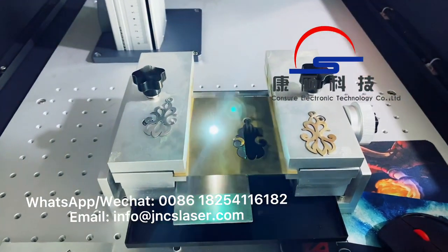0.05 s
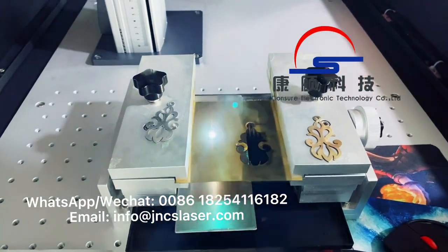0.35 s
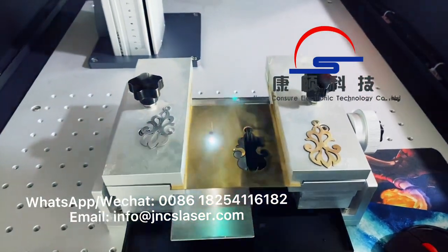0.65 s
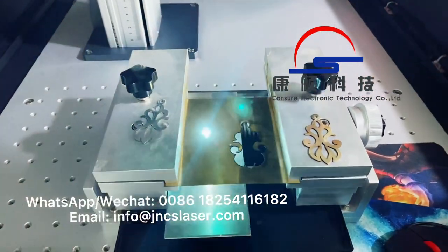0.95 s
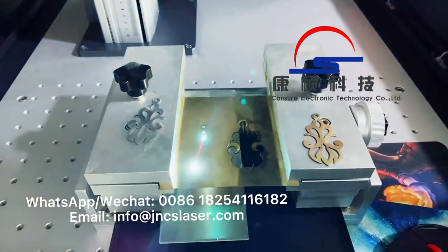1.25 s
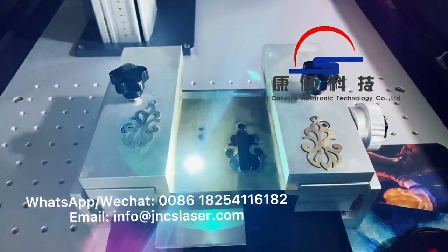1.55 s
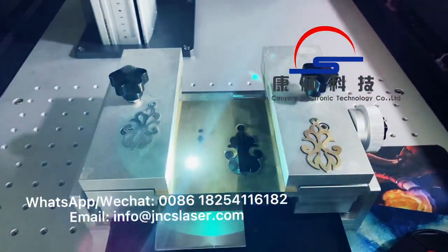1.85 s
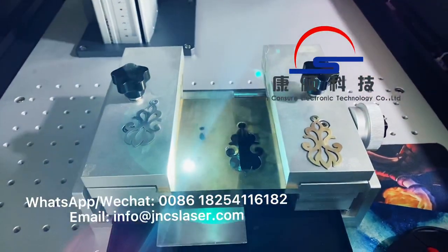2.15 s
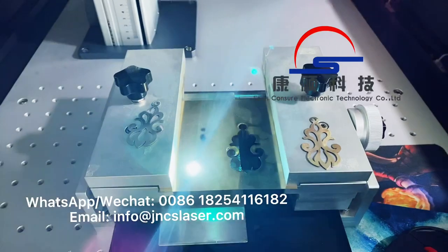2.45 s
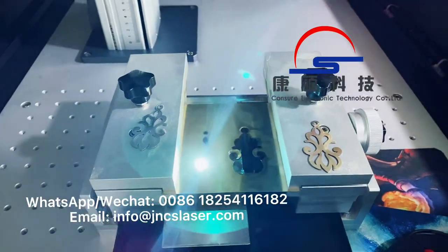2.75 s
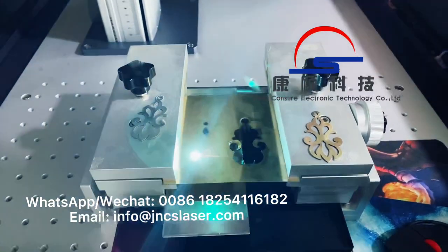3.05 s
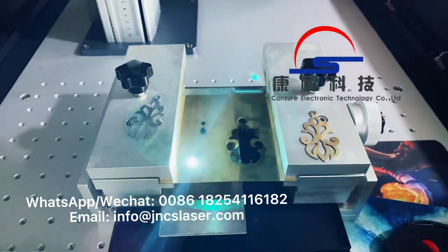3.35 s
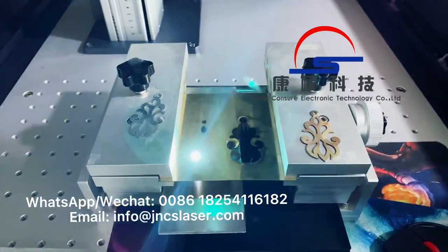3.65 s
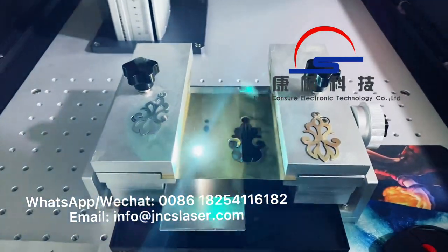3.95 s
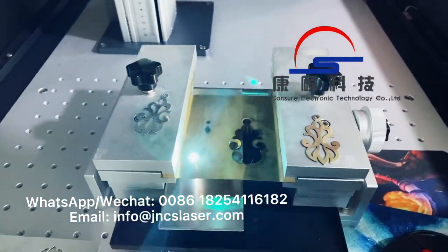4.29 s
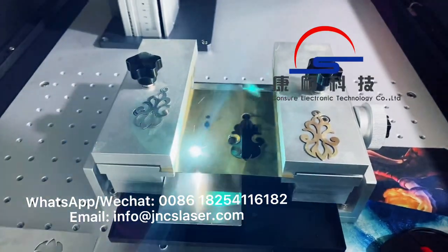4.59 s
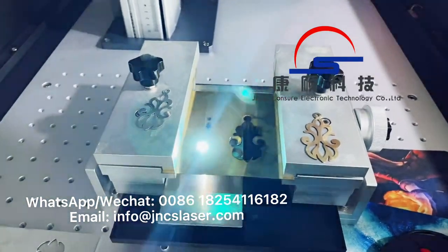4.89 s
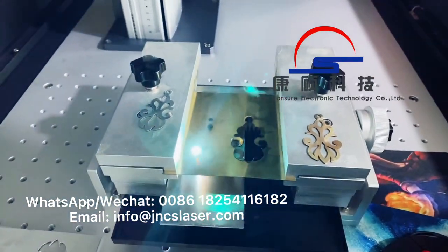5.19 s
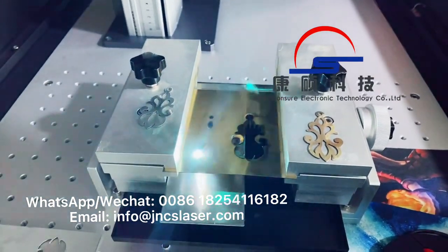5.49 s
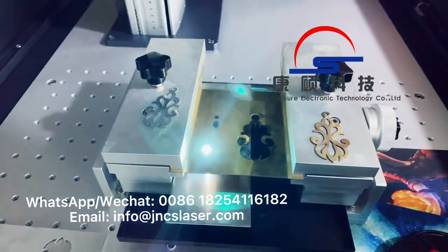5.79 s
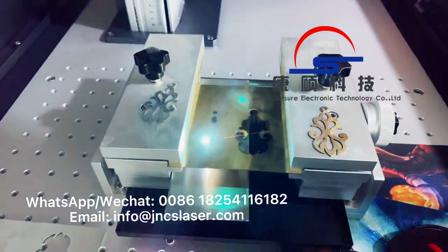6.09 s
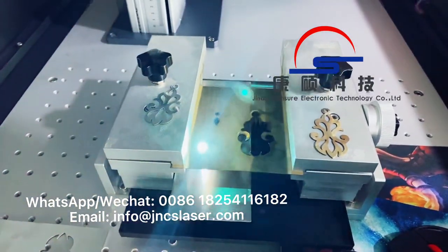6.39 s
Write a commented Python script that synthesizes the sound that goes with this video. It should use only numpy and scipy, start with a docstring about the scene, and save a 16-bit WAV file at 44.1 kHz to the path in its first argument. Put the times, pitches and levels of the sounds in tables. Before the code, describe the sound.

Over a low fan hum, a laser cutting sheet metal whistles and hisses, with one harsh rasp, a sharp pop and some sputtering.

```python
"""A wavering whistle with overtones over a bright hiss: a scanning laser cuts thin sheet metal.
The beam wobbles about 1300 times a second, so the vapour plume pulses, sounding the whistle and
chopping the hiss. It runs round the same outline about once a second. For half a second it bites hard
and rasps, then the melt pops, rings shrilly and sputters. Cooling fans drone in the workshop."""
import sys
import numpy as np
from scipy import signal
from scipy.fft import rfft, irfft, next_fast_len
from scipy.io import wavfile
from scipy.ndimage import uniform_filter1d

SR = 44100
rng = np.random.default_rng(int(sys.argv[2]) if len(sys.argv) > 2 else 0)


def pcm_store(signal):
    """Save signal as 16-bit PCM."""
    levels = np.round(np.clip(np.atleast_2d(signal), -1, 1) * 32767)
    wavfile.write(sys.argv[1], SR, levels.astype(np.int16).T)


N = 283563
T = np.arange(N) / SR
LAP_S = 1.0545  # once round the outline
# hard bites into the sheet: start/s, end/s, rasp level/dB, depth/0-1
BITES = [(0.783, 1.303, -25.5, 1), (2.42, 2.464, -34, 0.07), (3.406, 3.447, -30, 0),
         (4.46, 4.52, -34, 0.16), (5.515, 5.587, -31, 0.08)]


def undb(db):
    """Decibels to gain."""
    return 10 ** (np.asarray(db) / 20)


def unit(x):
    """Scale to rms 1."""
    return x / np.sqrt(np.mean(x ** 2))


def curves(rows):
    """Each column of a time table, linearly interpolated."""
    times_s, *columns = np.transpose(rows)
    return [np.interp(T, times_s, column) for column in columns]


def bells(rows):
    """Gaussian bumps in dB from rows of t/s, half-width/s, gain/dB."""
    return sum(db * np.exp(-((T - at_s) / half_s) ** 2) for at_s, half_s, db in rows)


def stretch(start_s, end_s, fade_s, clock_s=T):
    """1 between start and end, with linear fades."""
    return np.clip(np.minimum(clock_s - start_s, end_s - clock_s) / fade_s + .5, 0, 1)


def walk(rate_hz):
    """Smooth random wander, rms 1."""
    step = max(int(SR / rate_hz), 1)
    return unit(uniform_filter1d(np.repeat(rng.standard_normal(N // step + 1), step), step)[:N])


def drift(rows, bite, bite_db, wander_db):
    """Level in dB: follows a slow curve, jumps during a bite, wanders a little."""
    return curves(rows)[0] + bite_db * bite + wander_db * walk(14)


def colour(x, spectrum):
    """Filter x by rows of f/Hz, gain/dB; rms 1."""
    hz, db = np.transpose(spectrum)
    size = next_fast_len(N)
    bins_hz = np.maximum(np.fft.rfftfreq(size, 1 / SR), 1)
    gain = undb(np.interp(np.log(bins_hz), np.log(hz), db))
    return unit(irfft(rfft(x, size) * gain, size)[:N])


def resonance(x, hz, width_hz):
    """Two passes through a peak filter; rms 1."""
    b, a = signal.iirpeak(hz, hz / width_hz, fs=SR)
    return unit(signal.lfilter(b, a, signal.lfilter(b, a, x)))


def puffs(phase, depth):
    """Turbulence leaving the cut in one puff per wobble."""
    return rng.standard_normal(N) * np.exp(depth * np.cos(phase))


def partial(phase, multiple, db, flutter_db, blur_rad):
    """One line of the plume; the restless melt shakes its level and phase."""
    shake_db = flutter_db * (walk(60) + 1.09 * walk(420))
    jitter = blur_rad * (walk(70) + 0.2 * walk(400))
    tone = np.sqrt(2) * np.sin(multiple * phase + jitter + rng.uniform(0, 2 * np.pi))
    return undb(db + shake_db) * tone


def outline(turn_s, plume_lag_s):
    """Strokes repeat each lap: share of slow wobble (0-1), and whistle lift/dB smoothed by inertia."""
    # slow-wobble strokes within a lap: start/s, end/s, lift/dB
    strokes = [(0.131, .175, 3.5), (0.196, .262, 5), (.275, .288, -1.5), (0.304, 0.327, -2),
               (0.461, .565, 3.5), (.72, 0.737, -0.5), (.77, 0.803, 4), (0.877, .972, 5),
               (1.004, 1.044, 4.5)]
    slow, lift_db = np.zeros(N), np.zeros(N)
    for start_s, end_s, db in strokes:
        gate = stretch(start_s, end_s, turn_s, clock_s=T % LAP_S)
        slow += gate
        lift_db += db * gate
    return slow, uniform_filter1d(lift_db, size=int(plume_lag_s * SR))


def whistle(phase, slow, bite, lift_db):
    """The plume swells once per wobble: a wavering note with an airy skirt and rougher overtones."""
    # base levels of harmonics 1-4: t/s, level/dB
    first = [(0, -41.5), (.27, -37), (.49, -41), (.53, -32), (.65, -42.5), (.77, -46), (.8, -34.5),
             (1.66, -30), (2.26, -37.5), (2.64, -33.5), (2.93, -39.5), (3.75, -33.5), (4.02, -38.5),
             (4.29, -32.5), (4.68, -35), (5.31, -30.5), (6.07, -37), (6.43, -31.5)]
    second = [(0, -48), (.23, -40), (.33, -49), (.51, -42), (.86, -49), (1.66, -43), (2.77, -45),
              (3.1, -38.5), (3.17, -60), (3.33, -39.5), (3.7, -44.5), (4.1, -37.5), (4.9, -34.5),
              (4.96, -49), (5.06, -34), (5.8, -37.5), (6, -45.5), (6.43, -43)]
    third = [(0, -45), (.55, -40), (.76, -41), (.8, -34.5), (1.12, -32.5), (1.4, -41.5), (2.4, -53),
             (3.3, -62), (3.82, -40.5), (4.42, -47), (4.54, -33), (4.68, -41.5), (5.2, -41.5),
             (5.64, -33.5), (6.12, -42), (6.43, -38)]
    fourth = [(0.0, -48.4), (0.41, -35), (0.68, -45), (1.19, -43.5), (1.24, -34), (1.5, -46.2), (3.09, -41),
              (5.08, -42.5), (5.13, -35), (5.96, -46), (6.2, -35.7), (6.43, -42)]
    # weak overtones following the third: multiple of wobble rate, gain/dB
    upper = [(5, -9.5), (7, -10.5)]
    # the plume falters: t/s, half-width/s, gain/dB
    falters = [(.635, 0.019, -9), (1.33, .015, -8), (2.42, .03, -4), (2.855, 0.014, -7), (2.925, .015, -5),
               (3.995, .015, -5), (5.575, .025, -5), (6.272, 0.011, -6)]
    first_db = drift(first, bite, bite_db=7, wander_db=.5) + lift_db + bells(falters)
    overdrive_db = 2 * first_db + 2  # a hard swing distorts into the octave
    second_db = np.maximum(drift(second, bite, bite_db=1, wander_db=2), overdrive_db)
    third_db = drift(third, bite, bite_db=11, wander_db=.6)
    sag_db = -2.5 * slow
    fourth_db = drift(fourth, bite, bite_db=7, wander_db=.6) + sag_db
    upper_db = 0.6 * third_db - 13.5 + sag_db
    out = partial(phase, 1, first_db + 1.16 * walk(70), flutter_db=0.21, blur_rad=0.15)
    out += undb(first_db - 14.5) * resonance(rng.standard_normal(N), hz=1293, width_hz=103)
    out += partial(phase, 2, second_db, flutter_db=1.34, blur_rad=0.3)
    out += partial(phase, 3, third_db, flutter_db=1.56, blur_rad=0.14)
    out += partial(phase, 4, fourth_db, flutter_db=2, blur_rad=0.29)
    return out + sum(partial(phase, k, upper_db + db, flutter_db=3, blur_rad=.28) for k, db in upper)


def hiss(phase, bite):
    """A broad jet of escaping vapour and a bright hiss, flickering together."""
    # jet spectrum: f/Hz, gain/dB
    jet_spectrum = [(900, -18.5), (1500, -3.5), (2000, -9.5), (2250, 0.5), (2900, -0.5), (3500, 1),
                    (4400, -0.5), (5500, -1), (7200, 0), (8300, -1.5), (10000, 0), (15000, -9)]
    # bright hiss spectrum, with a narrow peak at the whistle's seventh harmonic: f/Hz, gain/dB
    bright_spectrum = [(5000, -24.5), (8700, -9.5), (9250, 1.5), (9800, -16), (10600, 2), (11600, 4),
                       (12500, 0), (13600, -4.5), (14300, -6), (14900, -22), (15700, -10)]
    # base levels: t/s, level/dB
    jet_levels = [(0, -28.5), (.17, -29.5), (.3, -34), (.55, -26), (.63, -32), (1.1, -30.5), (1.38, -32),
                  (1.93, -29.5), (2.1, -34), (2.55, -31), (5.7, -33), (6.42, -31)]
    bright_levels = [(0, -27), (.17, -27.5), (.31, -35.5), (.54, -27), (.63, -33.5), (.76, -31), (1.3, -32),
                     (1.42, -33), (1.56, -28.5), (1.98, -30), (2.15, -37), (2.85, -33), (3.44, -36.5),
                     (3.74, -31), (4.3, -34.5), (4.93, -31.5), (5.4, -36), (5.98, -31.5), (6.43, -34.5)]
    # spurts of sparks: t/s, half-width/s, gain/dB
    spurts = [(.56, .025, 2), (4.45, .012, 3), (5.56, .02, 2.5)]
    jet_db = drift(jet_levels, bite, bite_db=4, wander_db=.5)
    bright_db = drift(bright_levels, bite, bite_db=3, wander_db=.5) + bells(spurts)
    flicker = undb(0.73 * walk(40) + 1.37 * walk(300))
    jet = colour(puffs(phase, depth=0.24), jet_spectrum) * undb(jet_db)
    bright = colour(puffs(phase, depth=0.58), bright_spectrum) * undb(bright_db)
    return flicker * (jet + bright)


def fans():
    """Wavering blade tones over a low rush of air."""
    # blade tones: f/Hz, level/dB
    blade_tones = [(84.8, -49), (127.3, -58.5), (169.7, -55), (211.5, -57), (253.5, -59.5), (511.4, -63),
                   (597.5, -61.5), (1033, -61.5), (2232, -55.5)]
    # rush spectrum: f/Hz, gain/dB
    rush_spectrum = [(20, -32), (35, -32), (50, -7), (70, 1.5), (105, -5), (200, -5), (320, -6.5),
                     (500, -10), (900, -7.5), (1500, -13), (2200, -16.5), (8000, -17)]
    # background level, ducking after the loud burst and slowly recovering a little: t/s, level/dB
    background_levels = [(0, -34.5), (1.3, -34), (2.0, -38), (2.12, -39.5), (4.5, -38.5), (6.4, -38)]
    hum = sum(undb(db + 2 * walk(4.6)) * np.sqrt(2) * np.sin(2 * np.pi * hz * T + 0.52 * walk(2.86))
              for hz, db in blade_tones)
    rush = colour(rng.standard_normal(N), rush_spectrum)
    return hum + rush * undb(curves(background_levels)[0] + walk(9))


def rasp(phase, attack_s, fade_s):
    """During a hard bite, uneven puffs ring broad bands around the overtones."""
    # rasp resonances: f/Hz, width/Hz, gain/dB
    modes = [(2340, 110, -5.5), (2596, 230, 4.5), (2910, 160, -6), (3926, 170, 1.5), (6490, 90, -3),
             (7980, 350, -5)]
    gate = sum(undb(db) * np.clip(np.minimum((T - start_s) / attack_s, (end_s - T) / fade_s), 0, 1)
               for start_s, end_s, db, _ in BITES)
    turbulence = puffs(phase, depth=0.84)
    return gate * unit(sum(undb(db) * resonance(turbulence, hz, width_hz) for hz, width_hz, db in modes))


def pops(start_hz, end_hz, fall_s, rise_s, thump_s, crack_s):
    """A short crack, then a thump whose pitch drops as the ball of vapour spreads."""
    # vapour flashes: t/s, crack/dB, thump/dB
    flashes = [(1.3163, -10, -5.5), (1.568, -25, -30), (1.646, -16.5, -26), (1.763, -28, -30),
               (1.811, -21, -29), (2.057, -26, -25), (2.371, -26, -51)]
    crack_spectrum = [(200, 2), (550, 5), (1200, 0.5), (2300, -2), (4000, 0.5), (5500, -10), (15000, -25)]
    noise = colour(rng.standard_normal(N), crack_spectrum)
    out = np.zeros(N)
    for at_s, crack_db, thump_db in flashes:
        age_s = np.maximum(T - at_s, 0)
        cycles = end_hz * age_s + (start_hz - end_hz) * fall_s * (1 - np.exp(-age_s / fall_s))
        envelope = np.exp(-age_s / thump_s) * (1 - np.exp(-age_s / rise_s))
        out += undb(thump_db) * np.sin(2 * np.pi * cycles) * envelope
        out += undb(crack_db) * noise * np.exp(-abs(T - at_s) / crack_s)
    return out


def shrill(phase, wobble_hz, start_s, end_s):
    """The melt repeats every fourth wobble: stuttering lines, mostly between the overtones."""
    # ring lines: multiple of wobble rate, gain/dB
    low_lines = [(2.75, -5), (3.75, -3.5), (4.75, 2.5), (5, -8.5), (5.75, 1)]
    high_lines = [(6.75, 0), (7.75, 2), (8.4, -1), (8.53, -2), (8.77, 0), (9.47, -9), (10, -10)]
    # ring strength: t/s, low lines/dB, high lines/dB
    levels = [(1.33, -45, -45), (1.55, -38, -36), (1.9, -36, -36.5), (2.1, -38, -41), (2.4, -42.5, -42.5),
              (2.85, -42.5, -36.5), (3.26, -42, -39.5), (3.44, -45.5, -46), (3.75, -40.5, -42.5),
              (3.92, -53, -41)]
    # the ring flares: t/s, half-width/s, gain/dB
    flares = [(1.89, 0.055, 3), (2.775, 0.034, 1.5), (2.935, .03, 4)]
    low_db, high_db = curves(levels)
    low = sum(partial(phase, k, low_db + db - .3, flutter_db=1.7, blur_rad=.13) for k, db in low_lines)
    high = sum(partial(phase, k, high_db + db - .3, flutter_db=1.5, blur_rad=.49) for k, db in high_lines)
    hold_db = 0.11 * (wobble_hz - wobble_hz.mean())  # the pattern holds best at the faster wobble
    stutter_db = 1.4 * walk(170)
    gate = stretch(start_s, end_s, fade_s=0.045)
    return (low + high) * undb(hold_db + stutter_db + bells(flares)) * gate


def sputter(phase, spits_per_s, grain_s, growl_db):
    """Molten metal spits and growls on every fourth wobble; also returns the whistle's swell/dB."""
    # bursts of spits: t/s, half-width/s, crackle/dB, whistle swell/dB
    bursts = [(1.582, 0.037, -35, 7), (1.763, 0.0075, -42, 10.5), (1.817, 0.013, -29, 11.5),
              (1.943, 0.023, -26.5, 8.5), (2.03, 0.032, -21, 20), (3.345, 0.026, -34.5, 8),
              (4.475, .012, -40, 1.3), (5.539, 0.015, -34.5, -5)]
    # spit spectrum: f/Hz, gain/dB
    spectrum = [(40, 4), (150, -1), (320, -9), (600, -8), (1000, 0.5), (1400, 0), (1900, -5.5),
                (2600, -1.5), (4000, -6.5), (7000, -15), (14000, -15.5)]
    envelope, swell_db = np.zeros(N), np.zeros(N)
    for at_s, half_s, db, lift_db in bursts:
        bell = np.exp(-((T - at_s) / half_s) ** 2)
        envelope += undb(db) * bell
        swell_db += lift_db * bell ** 0.76  # outlasts the crackle
    uneven_rate_hz = spits_per_s * undb(3 * walk(150))
    spits = np.diff(np.floor(np.cumsum(uneven_rate_hz) / SR), prepend=0)
    grains = signal.lfilter([1], [1, -np.exp(-1 / (grain_s * SR))], spits)
    growl = partial(phase, 1 / 4, -0.44, flutter_db=6.5, blur_rad=0.55)
    growl += partial(phase, 3 / 4, 0, flutter_db=2, blur_rad=0.46)
    crackle = colour(grains * rng.standard_normal(N), spectrum)
    return envelope * (crackle + undb(growl_db) * growl), swell_db


def bench(x, gain, travel_s, drift_s, count):
    """Clamp and bench reflections comb x; paths shift as the spot circles and the microphone drifts."""
    fine = signal.resample_poly(x, up=4, down=1)
    fine_s = np.linspace(0, N / SR, len(fine), endpoint=False)
    out = x.copy()
    for lag_s, turn in rng.uniform((.0008, 0), (.009, 1), (count, 2)):
        path_s = lag_s + travel_s * np.sin(2 * np.pi * (T / LAP_S + turn)) + drift_s * walk(0.67)
        out += gain * np.interp(T - path_s, fine_s, fine, left=0)
    return out / np.sqrt(1 + count * gain ** 2)


def workshop(x, t60_s, wet_db):
    """Add dense, fading room reflections, keeping the power."""
    age_s = T[:int(t60_s * SR)]
    tail = rng.standard_normal(len(age_s)) * np.exp(-np.log(1000) * age_s / t60_s) * (age_s > .001)
    wet = signal.fftconvolve(x, tail / np.linalg.norm(tail))[:N]
    return (x + undb(wet_db) * wet) / np.sqrt(1 + undb(wet_db) ** 2)


def scene():
    """One wobble phase drives the cut, heard with reflections; pops and fans are added dry."""
    fast_hz, slow_hz = 1314.5, 1298
    slow, lift_db = outline(turn_s=.016, plume_lag_s=0.042)
    wobble_hz = fast_hz + (slow_hz - fast_hz) * slow + 1.293 * walk(45)
    phase = 2 * np.pi * np.cumsum(wobble_hz) / SR
    bite = sum(depth * stretch(start_s, end_s, fade_s=.008) for start_s, end_s, _, depth in BITES)
    crackle, swell_db = sputter(phase, spits_per_s=190, grain_s=0.0021, growl_db=-14)
    cut = crackle + whistle(phase, slow, bite, lift_db + swell_db)
    cut += shrill(phase, wobble_hz, start_s=1.35, end_s=3.9)
    cut += bench(hiss(phase, bite), gain=0.3, travel_s=6e-6, drift_s=2e-5, count=6)
    cut += rasp(phase, attack_s=0.003, fade_s=0.028)
    mono = workshop(cut, t60_s=0.39, wet_db=-17)
    mono += pops(start_hz=403, end_hz=55, fall_s=0.0053, rise_s=0.0013, thump_s=0.011, crack_s=0.00086)
    mono += fans()
    return np.array([mono, mono])


def record(dry):
    """The microphone drops the deepest bass and cuts the top steeply."""
    bottom_hz, top_hz = 30, 15700
    lean = signal.sosfilt(signal.butter(3, bottom_hz, "high", fs=SR, output="sos"), dry)
    return signal.sosfilt(signal.ellip(10, .2, 80, top_hz, fs=SR, output="sos"), lean)


dry = scene()
out = record(dry)
pcm_store(out)
```